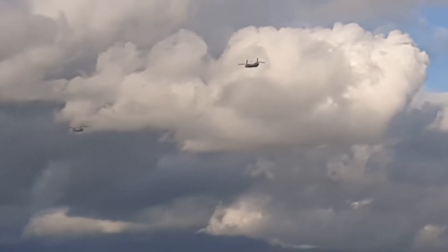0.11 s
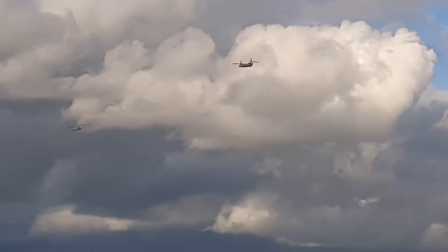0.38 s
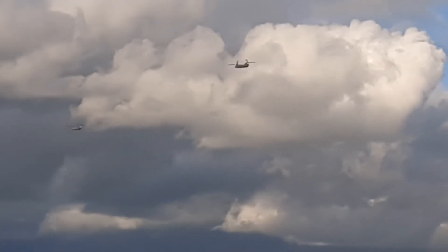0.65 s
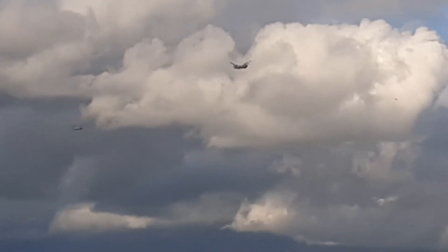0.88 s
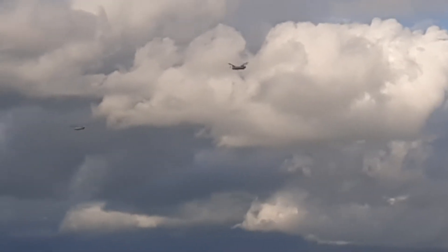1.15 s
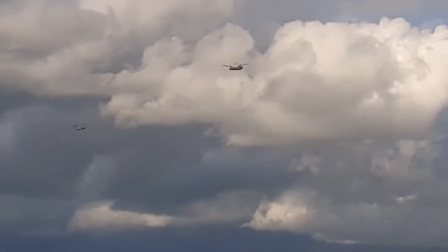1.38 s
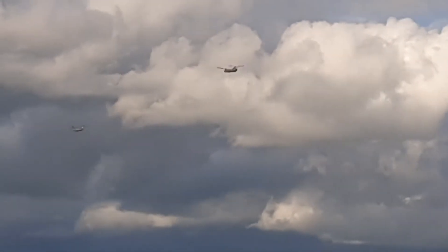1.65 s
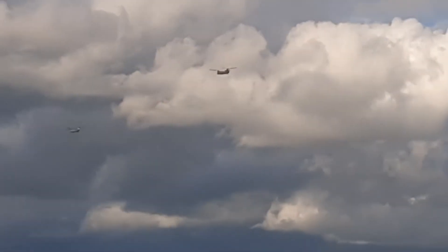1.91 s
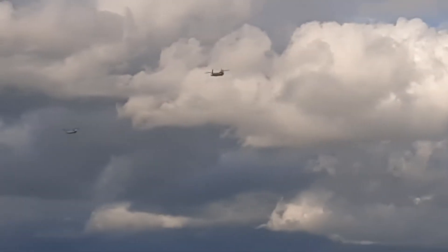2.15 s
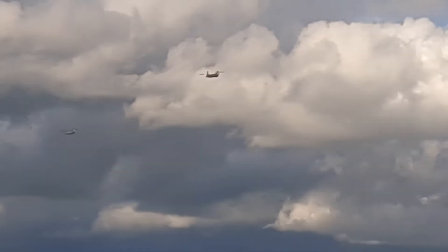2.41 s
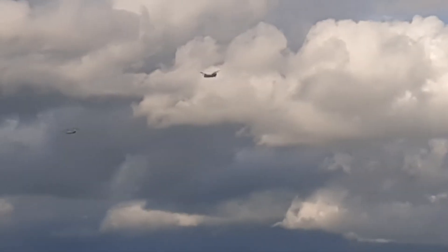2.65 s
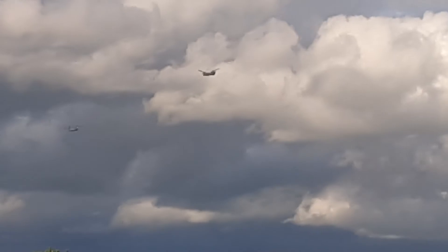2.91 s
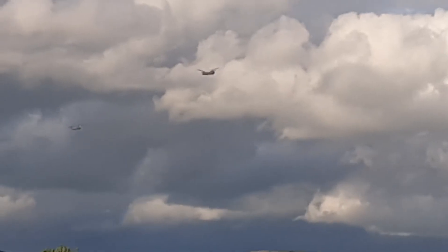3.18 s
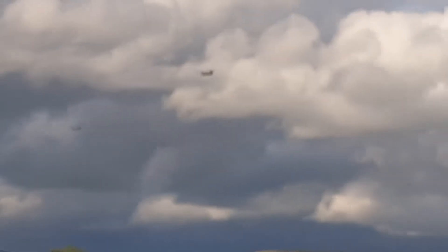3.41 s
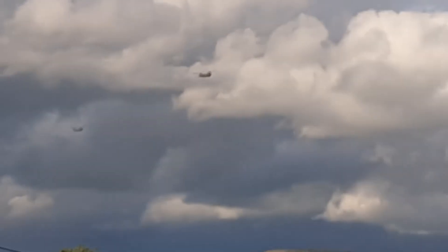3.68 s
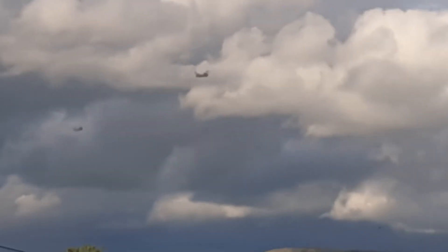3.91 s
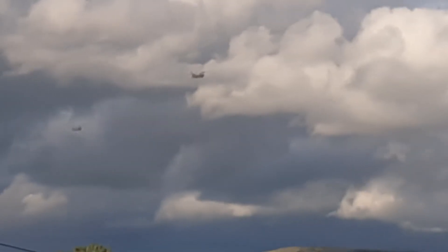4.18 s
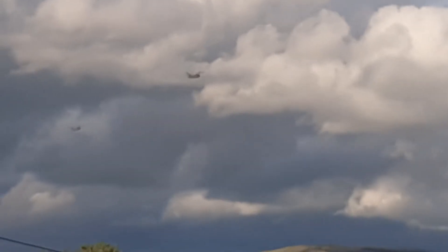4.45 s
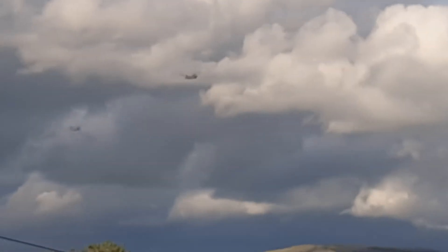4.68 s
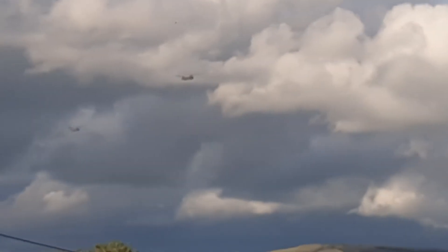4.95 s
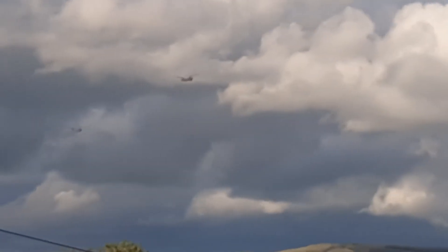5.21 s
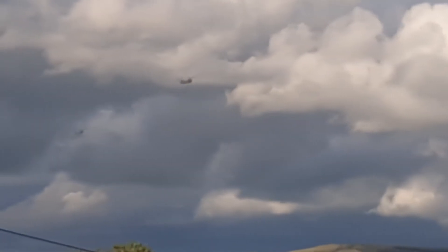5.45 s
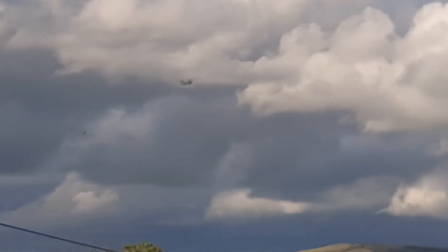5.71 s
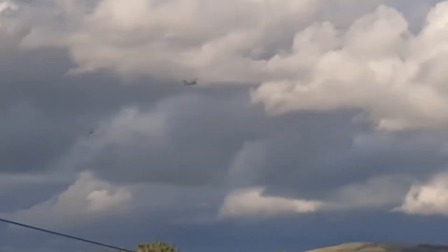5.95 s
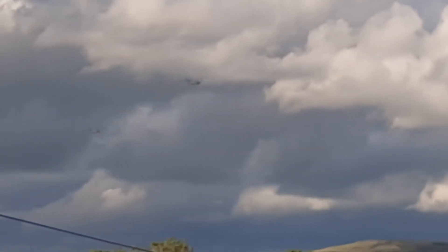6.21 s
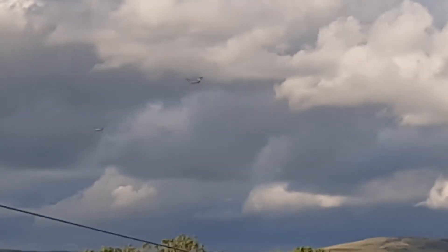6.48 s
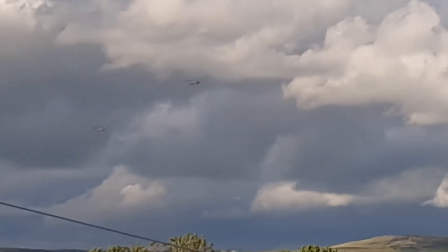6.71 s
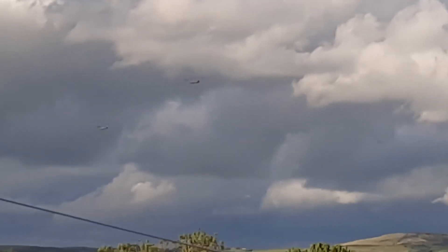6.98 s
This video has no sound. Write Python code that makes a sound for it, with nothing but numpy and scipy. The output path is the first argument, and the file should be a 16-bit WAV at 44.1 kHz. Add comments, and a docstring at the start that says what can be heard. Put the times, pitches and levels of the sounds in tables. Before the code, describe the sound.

Rapid low rotor thudding and dull roar from two receding helicopters, slaps sharpening midway and near the end, amid bumpy wind on the microphone.

```python
"""Two helicopters flying away

Two twin-rotor helicopters draw away, far off over open country, heard by a small two-port microphone.
Rotor thuds are pulses of pressure, blade slaps short bursts, the roar shaped noise and the whines blurred tones.
Slaps, roar and whines arrive straight and off the ground; the land scatters thuds and slaps.
Noise gusts and single pops buffet each port on its own, with a faint tick, over the recorder's hiss."""
import sys
import numpy as np
from scipy import signal
from scipy.fft import rfft, irfft, next_fast_len
from scipy.io import wavfile
from scipy.ndimage import uniform_filter1d

SR = 44100
rng = np.random.default_rng(int(sys.argv[2]) if len(sys.argv) > 2 else 0)


def unload_wav(signal):
    """Save mono or channel-first audio to the path in sys.argv[1] as 16-bit WAV at rate SR, clipped to [-1, 1]."""
    wavfile.write(
        sys.argv[1],
        SR,
        np.round(np.clip(np.atleast_2d(signal).T, -1, 1) * 32767).astype(np.int16),
    )


def ratio_of_db(decibels):
    """Turn decibels (scalar or array-like) into linear amplitude factors; 0 dB maps to 1."""
    return 10 ** (np.asarray(decibels, float) / 20)


N = 313110
T = np.arange(N) / SR  # time in seconds


def evened(x):
    """Scales a sound to an rms of 1."""
    return x / np.sqrt(np.mean(x ** 2) + 1e-20)


def columns(rows, at):
    """Reads every column of a table, joining its points by straight lines."""
    x, *values = np.transpose(rows)
    return np.array([np.interp(at, x, v) for v in values])


def spectra(rows, hz):
    """Reads the columns of a table along a logarithmic frequency axis."""
    log_rows = [(np.log(f), *v) for f, *v in rows]
    return columns(log_rows, np.log(hz + 1))


def coloured(x, rows):
    """Filters each channel by its own dB column."""
    hz = np.fft.rfftfreq(N, 1 / SR)
    return irfft(rfft(x) * ratio_of_db(spectra(rows, hz)), N)


def drift(seconds, channels=1):
    """Makes a slow random wander of rms 1, in steps of 32 samples, by smoothing noise twice."""
    size = max(int(seconds * SR / 32), 1)
    slow = rng.standard_normal((channels, N // 32 + 1))
    slow = uniform_filter1d(uniform_filter1d(slow, size), size)
    return np.repeat(evened(slow), 32, axis=1)[:, :N]


BEATS_PER_S = 11.25  # blade beats at the helicopter itself
# How each helicopter draws away ever faster. In order: reference time in seconds, distance then in m,
# speed away then in m/s, gain of speed in m/s per second.
FIRST_PATH = 0, 942.7, 13.56, 5.76
SECOND_PATH = 2.6, 999.0, 23.7, 2.43


def beats(path):
    """Counts the blade beats heard so far: sound from a growing distance comes later, stretching them."""
    s, metres, speed, gain = path
    away = T - s
    distance = metres + speed * away + gain * away ** 2 / 2
    return BEATS_PER_S * (T - distance / 343)  # speed of sound in m/s


# Blade passes, each heard once a beat for a while.
# Each row: place in the beat from 0 to 1, pitch in Hz before the distance stretches it,
# loudest moment in seconds, half length of the swell in seconds, peak in dB before unevenness and pan.
FIRST_THUDS = [(0.276, 52, 0.55, 0.95, -25.9), (0.009, 59, 0.56, 0.37, -25.5),
               (0.193, 165, 0.55, 0.67, -29.1), (0.736, 46, 0.73, 0.8, -30.3),
               (0.492, 48, 0.91, 0.88, -29.7), (0.881, 45, 0.9, 0.45, -24.5),
               (0.283, 109, 1.61, 0.21, -29.3), (0.99, 50, 1.92, 0.4, -20.5), (0.175, 72, 2.45, 0.5, -26.5),
               (0.405, 61, 2.56, 0.98, -27.3), (0.266, 119, 2.74, 0.4, -26), (0.197, 205, 2.8, 0.4, -26.5),
               (0.137, 160, 1.45, 0.3, -34), (0.148, 220, 1.92, 0.25, -30), (0.152, 170, 2.27, 0.2, -31),
               (0.257, 180, 2.27, 0.2, -30), (0.152, 210, 2.92, 0.18, -30), (0.275, 170, 2.9, 0.25, -31),
               (0.322, 76, 0.8, 0.4, -33), (0.2, 190, 1.9, 0.25, -30), (0.368, 76, 1.9, 0.3, -31),
               (0.13, 75, 2.3, 0.3, -31), (0.44, 75, 3.1, 0.3, -33), (0.023, 71, 2.87, 0.71, -26.3)]
SECOND_THUDS = [(0.807, 46, 3.07, 0.35, -24.9), (0.183, 74, 3.82, 0.39, -30.5),
                (0.996, 72, 4.05, 0.73, -24.3), (0.812, 64, 4.44, 0.99, -23.4),
                (0.945, 132, 4.62, 1.0, -24.5), (0.031, 67, 5.1, 0.78, -28), (0.56, 61, 6.14, 1.2, -32.3),
                (0.053, 65, 6.68, 0.63, -26.0), (0.407, 52, 6.76, 0.88, -38.5),
                (0.875, 175, 4.45, 0.4, -28), (0.647, 195, 6.85, 0.4, -24), (0.012, 170, 4.75, 0.4, -29),
                (0.185, 140, 6.55, 0.22, -29), (0.942, 190, 6.75, 0.45, -28), (0.772, 180, 6.9, 0.25, -30),
                (0.196, 62, 6.99, 1.1, -26.5), (0.801, 55, 7.16, 1.0, -25.0)]


def rotors(path, thuds):
    """Each blade pass is a push of air between two pulls, a little uneven over time."""
    beat, out = beats(path), np.zeros(N)
    for place, hz, s, swell, db in thuds:
        near = abs(T - s) < 2 * swell
        from_centre = (beat[near] - place + .5) % 1 - .5
        u = np.pi * hz * from_centre / BEATS_PER_S
        uneven_db = 1.7 * drift(0.14)[0, near]
        level = ratio_of_db(db + uneven_db) * np.exp(-((T[near] - s) / swell) ** 4)
        out[near] += level * np.cos(2 * u) * np.exp(-(u / 1.3) ** 2)
    return out * ratio_of_db([[-0.75], [0.75]])  # left, right


# Blades cutting the wake of the other rotor.
# Each row: centre in seconds, level of the body in dB before pan, crack against the body in dB,
# pitch of the body in Hz.
SLAPS = [(1.4405, -37, -30, 580), (1.5751, -30, -6, 580), (2.693, -40, -19, 560), (2.794, -35, -25, 580),
         (2.894, -33, -25, 486), (2.9835, -29.5, -9, 560), (3.048, -31, -23, 560), (3.602, -31, -27, 400),
         (3.7007, -25.5, -34, 420), (3.799, -25, -30, 460), (3.8951, -32.5, -36, 495),
         (4.0836, -27, -25, 390), (4.1823, -24.5, -36, 460), (4.2785, -24.5, -21, 462),
         (4.3745, -26, -39, 490), (4.4731, -24, -37, 494), (4.5693, -21.5, -19, 440),
         (4.6634, -14.5, -23, 460), (4.726, -31, -17, 613), (4.7602, -14, -17, 493),
         (4.8573, -17, -14.5, 475), (4.9541, -18.5, -11, 460), (5.051, -22.5, -5.5, 450),
         (5.1532, -29, -29, 460), (5.2483, -28.5, -43, 560), (5.3441, -30, -31, 593),
         (5.5301, -39, -37, 556), (6.251, -44, -7, 565), (6.4013, -33, -22, 505), (6.5247, -28, -6.5, 520),
         (6.5974, -31, -28, 407), (6.625, -30, -17, 600), (6.6933, -21, -8, 474), (6.744, -34, -27, 480),
         (6.7919, -25.5, -17, 456), (6.89, -25.5, -46, 510), (6.9356, -38, -14, 527),
         (6.9906, -28.5, -3, 418), (7.0893, -26.5, -6.5, 397)]


def slaps():
    """Bursts of a few cycles, softened by the long path; the crisp ones carry a higher crack."""
    body_s, crack_s, crack_hz = 0.0019, 0.0023, 750  # half lengths; pitch
    dull_stretch = 0.022  # a body lasts longer by this share for each dB its crack lacks
    out, t = np.zeros(N + SR), np.arange(-529, 529) / SR
    for s, db, crack_db, hz in SLAPS:
        half = body_s * (1 - dull_stretch * crack_db)
        body = np.exp(-(t / half) ** 2) * np.cos(2 * np.pi * hz * t + 1.2)
        crack = np.exp(-(t / crack_s) ** 2) * np.cos(2 * np.pi * crack_hz * t + 1.2)
        at = round(s * SR) - len(t) // 2
        out[at:at + len(t)] += (body + ratio_of_db(crack_db) * crack) * ratio_of_db(db)
    return out[:N] * ratio_of_db([[-1.25], [1.25]])  # left, right


# Engine and rotor roar, changing with distance and bent by restless air.
# Each row: time in seconds, level in dB before layers and colour, swell of the body in dB.
ROAR = [(0, -46, 2.5), (.4, -44.5, -2), (1.0, -44.5, -1.5), (1.6, -49, 1.5), (2.1, -50, 2), (2.6, -50.5, 1),
        (3.0, -51, 2.5), (3.4, -54.5, 6.5), (3.8, -49, -2), (4.1, -50, 3.5), (4.4, -50.5, 0.5),
        (4.85, -52.5, 9.5), (5.3, -54.5, 7.5), (5.8, -53.5, 0.5), (6.07, -59, 5.5), (6.55, -53, 4.5),
        (7.1, -50, 5)]
# Frequencies in Hz that split the roar into layers.
ROAR_SPLIT_HZ = 320, 510, 930, 1500
# One row a layer, low to high: dB over the mean level, share of the level changes,
# share of the body's swell, throb in dB.
ROAR_LAYERS = [(10, 0.66, 0.88, 2), (-1.5, 1, 1, 1), (8, 0.5, 0.49, 0.2), (-2.5, 0.77, 0.24, 0.37),
               (-5, 0.6, 0.1, 0.37)]
# Tone colour of the roar. Each row: frequency in Hz, left in dB, right in dB.
ROAR_COLOUR = [(28, -15, -17.5), (43.6, -5, 9.5), (70, 5, 11), (163, 5.5, 7), (222, -6, -5.5),
               (305, 6, 3.5), (420, 10.5, 12.5), (558, 2.5, 3.5), (946, -4.5, -1.5), (995, 1.5, 7.5),
               (1510, 2, 1), (1500, -2, 8.5), (1920, -1.5, 1.5), (2572, -8, -3.5), (3006, -17.5, -24.5),
               (3620, -65, -66.5)]
# How alike the two ports are. Each row: frequency in Hz, likeness (1 is the same).
ROAR_SAME = [(100, 1), (250, 0.99), (700, 0.96), (1000, 0.8), (1400, 0.45), (2600, 0.35)]
# The air briefly carries the roar more clearly. Each row: centre in seconds, half length in seconds,
# centre in Hz, boost in dB, reach in octaves.
SURGES = [(0.26, 0.12, 640, 4, 0.43), (1.455, 0.43, 740, 1, .77), (2.702, 0.21, 177, 7.5, 0.52),
          (3.12, 0.11, 715, 10.5, 0.71), (4.088, 0.1, 1500, 6, 0.82), (4.833, 0.089, 477, 5, 1),
          (5.356, 0.15, 617, 3, .77), (6.594, 0.056, 407, 3, .77), (6.86, 0.17, 220, 3.5, 1)]


def roar():
    """Noise in drifting patches, throbbing with the rotors, built as a spectrum that changes over time."""
    frames, hz = N // 256 + 5, np.fft.rfftfreq(1024, 1 / SR)
    a, b, c, d, patches = rng.standard_normal((frames, 513, 5)).T
    patches = evened(uniform_filter1d(uniform_filter1d(patches, 5, 0), 30, 1))
    # the right port shares part of the left port's noise
    same = np.clip(spectra(ROAR_SAME, hz)[0], -1, 1)[:, None]
    left = a + 1j * b
    right = same * left + np.sqrt(1 - same ** 2) * (c + 1j * d)
    t = np.arange(frames) * 256 / SR
    level, swell = columns(ROAR, t)
    layer = np.searchsorted(ROAR_SPLIT_HZ, hz)
    over, share, body, throb_db = np.transpose(ROAR_LAYERS)[:, layer, None]
    level_db = level.mean() + over + share * (level - level.mean()) + body * swell
    # throbs with the first helicopter, then with the second
    beat = np.where(T < 3.5, beats(FIRST_PATH) - .17, beats(SECOND_PATH) - .93)
    level_db += throb_db * np.interp(t, T, np.cos(2 * np.pi * beat))
    for s, half, centre, db, octaves in SURGES:
        reach = np.exp(-(np.log2((hz + 1) / centre) / octaves) ** 2)
        level_db = level_db + db * np.outer(reach, np.exp(-((t - s) / half) ** 2))
    colour_db = spectra(ROAR_COLOUR, hz)[:, :, None]
    z = np.array([left, right]) * ratio_of_db(colour_db + level_db + 1.82 * patches + 17.5)
    return signal.istft(z, nperseg=1024, noverlap=768)[1][:, :N] / 32


# Gearbox and engine tones blurred by the air.
# Each row: pitch in Hz, width of the blur in Hz, loudest moment in seconds,
# half length of the swell in seconds, level in dB before flicker and pan.
WHINES = [(2032, 20, 2.1, 6.2, -68), (1776, 14, 0.8, 0.9, -66), (1432, 20, 0.8, 0.9, -67),
          (1682, 10, 6.62, 0.16, -57), (1680, 10, 6.93, 0.2, -58.5), (1700, 70, 6.75, .3, -63),
          (1690, 6, 5.8, 0.17, -63), (1550, 8, 6.45, 0.5, -65), (635, 55, 0.18, 0.1, -40.5),
          (615, 75, .33, .09, -42), (590, 45, .46, .05, -47), (620, 85, 1.49, 0.16, -45),
          (630, 60, 1.07, .09, -47), (805, 30, 6.92, .22, -49.5), (800, 30, 5.92, .17, -51),
          (600, 30, 6.58, .12, -48), (845, 15, 4.02, .12, -53), (800, 20, 3.84, .06, -52),
          (1215, 25, 4.12, .13, -59), (1540, 20, 4.06, .16, -62), (2034, 15, .15, .2, -65)]


def whines():
    """Wavering tones that surface for a while and flicker, each in a narrow blur of noise."""
    steady_hz = 8  # at this width the tone itself is as loud as its blur
    size = next_fast_len(N)
    hz, out = np.fft.rfftfreq(size, 1 / SR), 0
    for centre_hz, width, s, swell, db in WHINES:
        noise = rfft(rng.standard_normal(size))
        blur = irfft(noise / (1 + ((hz - centre_hz) / width) ** 2), size)[:N]
        pitch = centre_hz + width / 2 * drift(.1)[0]
        tone = evened(np.sin(2 * np.pi * np.cumsum(pitch) / SR))
        sound = evened(evened(blur) + steady_hz / width * tone)
        level = ratio_of_db(db + 2.2 * drift(.05)) * np.exp(-((T - s) / swell) ** 4)
        out = out + level * sound
    return out * ratio_of_db([[-1.5], [1.5]])  # left, right


# The straight sound, ahead of the stronger bounce; one row for the left port, one for the right.
# Each row: lead in milliseconds, strength against the bounce before the treble blurs.
GROUND = [(4.659, 0.57), (4.949, 0.74)]


def ground(x, lag_ms):
    """Arrivals a few ms apart fill every 200 Hz or so and hollow between; they blur in the treble."""
    hz = np.fft.rfftfreq(N, 1 / SR)
    blur = np.exp(-(hz / 1900) ** 2)
    arrivals = [1 + share * blur * np.exp(2j * np.pi * hz * ms / 1000) for ms, share in GROUND]
    # a weak later bounce, 4.98 ms behind
    arrivals = arrivals + 0.083 * blur * np.exp(-2j * np.pi * hz * 4.98 / 1000)
    port_lag = np.exp(-2j * np.pi * np.outer([0, lag_ms / 1e3], hz))  # shifts the right port only
    return irfft(rfft(x) * arrivals * port_lag, N)


def land(x):
    """Hills and fields scatter thuds and slaps into a short rumble, a fading tail of noise."""
    t = np.arange(SR // 2) / SR
    shared = 13.0 * rng.standard_normal(len(t))
    tail = rng.standard_normal((2, len(t))) + shared
    tail = evened(tail) * ratio_of_db(-60 * t / 0.3)  # falls 60 dB in 0.3 s
    rumble = signal.fftconvolve(x, tail / np.linalg.norm(tail[0]), axes=1)[:, :N]
    return x + ratio_of_db(-17) * rumble


def tick():
    """A faint tick close by: a few quick cycles under a bell-shaped swell."""
    t = T - 1.579
    return ratio_of_db(-50) * np.exp(-(t / .0004) ** 2) * np.sin(2 * np.pi * 4600 * t)


# Gusts over a calm breeze.
# Each row: centre in seconds, half length in seconds, left peak in dB, right peak in dB,
# before the breeze and any other gusts add to them.
GUSTS = [(0.0, 0.0079, -20.5, -68), (0.117, 0.049, -31.5, -32), (0.29, 0.08, -42, -38.5),
         (0.538, 0.034, -43, -41.5), (0.73, 0.1, -32, -44), (0.984, 0.058, -28.5, -41),
         (1.04, 0.081, -32.5, -39), (1.131, 0.045, -27, -48), (1.34, 0.1, -36, -45),
         (1.89, 0.061, -35.5, -33), (2.61, 0.1, -42, -44.5), (3.016, .04, -55, -54),
         (3.238, 0.043, -65, -49), (3.3, 0.024, -39, -55), (3.497, 0.14, -38.5, -44),
         (3.666, 0.059, -29.5, -37), (3.854, 0.062, -34, -45), (4.016, 0.078, -31.5, -35.5),
         (4.145, 0.037, -34.5, -54), (4.295, 0.23, -39, -31), (4.582, 0.067, -33.5, -24),
         (4.715, 0.13, -27.5, -37), (5.02, 0.036, -25.5, -25.5), (5.201, 0.11, -35.5, -29),
         (5.388, 0.075, -21.5, -28), (5.535, 0.054, -26, -55), (5.65, 0.13, -40, -39),
         (5.764, 0.11, -28.5, -36.5), (6.146, 0.057, -31, -39), (6.302, 0.053, -28, -52),
         (6.448, 0.14, -32.5, -36), (6.607, 0.079, -37, -29.5), (6.784, 0.049, -29, -25),
         (6.904, 0.069, -31.5, -54), (6.965, 0.044, -40, -30), (7.066, 0.017, -30.5, -53)]


def gusts():
    """Wind level at each port in dB: short swells of power on top of a drifting breeze."""
    power = ratio_of_db(2 * (-50.5 + 4 * drift(0.17, channels=2)))
    for s, half, *db in GUSTS:
        near = abs(T - s) < 4 * half
        fall_db = 6 * ((T[near] - s) / half) ** 2  # 6 dB down at the half length
        power[:, near] += ratio_of_db(2 * (np.array(db)[:, None] - fall_db))
    return 10 * np.log10(power)


# Colour of the wind's body. Each row: frequency in Hz, left in dB, right in dB;
# the result is scaled to rms 1, so only the shape and the balance count.
WIND_COLOUR = [(20, -17, -15.5), (44.3, -5.5, -2), (76, 7.5, 5.5), (160, -3, -1), (220, -26, -25.5),
               (395, -37, -28.5), (1000, -94, -87.5)]
# Colour of the edge of hard gusts, also scaled. Each row: frequency in Hz, level in dB.
WIND_EDGE = [(100, -34.5), (200, -4), (330, -5), (480, -9), (700, -28), (2500, -97.5)]


def wind():
    """Lumpy low pressure, unrelated in the two ports; hard gusts grow a brighter edge."""
    hard_gust_db = -11.5  # at this level the edge would be as loud as the body
    lump_db = 3.5 * drift(0.0061, channels=2) + drift(0.095, channels=2)
    lumps = rng.standard_normal((2, N)) * ratio_of_db(lump_db)
    gust_db = gusts()
    body = evened(coloured(lumps, WIND_COLOUR))
    edge = ratio_of_db(gust_db - hard_gust_db) * evened(coloured(lumps, WIND_EDGE))
    return ratio_of_db(gust_db) * (body + edge)


# Single eddies popping on one port.
# Each row: centre in seconds, level in dB, port (0 left, 1 right), pitch in Hz.
POPS = [(.946, -23, 0, 158), (.983, -17.5, 0, 182), (1.013, -15, 0, 187), (1.128, -21, 0, 120),
        (1.158, -17.5, 0, 136), (4.529, -22, 1, 131), (4.59, -12.5, 1, 188), (4.647, -21, 1, 157),
        (4.682, -16.5, 0, 158), (5.015, -14, 0, 136), (5.035, -18, 0, 220), (5.035, -20, 1, 220),
        (5.121, -22, 1, 201), (5.312, -19, 0, 179), (5.332, -16.5, 0, 135), (5.384, -11, 0, 240),
        (5.407, -14.5, 0, 188), (5.426, -14.5, 0, 200), (5.512, -16, 0, 136), (5.537, -15, 0, 164),
        (5.557, -18.5, 0, 179), (5.76, -21.5, 0, 177), (5.81, -19, 0, 125), (6.307, -22, 0, 137),
        (6.45, -15, 0, 148), (6.756, -18, 0, 176), (6.77, -18, 0, 190), (6.914, -21, 0, 162),
        (6.934, -22, 0, 179)]


def pops():
    """Each eddy is about one swing of pressure, starting at a random point of its cycle."""
    out = np.zeros((2, N))
    for (s, db, port, hz), turn in zip(POPS, rng.random(len(POPS))):
        near = abs(T - s) < 2 / hz
        u = hz * (T[near] - s)  # time in cycles
        out[port, near] += ratio_of_db(db) * np.exp(-(u / 0.45) ** 2) * np.cos(2 * np.pi * (u + turn))
    return out


# Recorder hiss. Each row: frequency in Hz, left in dB per Hz, right in dB per Hz, before creep and waver.
HISS = [(1500, -108, -104), (2970, -112, -106), (3860, -105, -99.5), (5800, -109, -100.5),
        (6600, -119, -110), (7900, -127, -112), (8100, -129, -128), (10900, -124, -123),
        (12500, -117, -116), (15500, -115, -113), (15900, -150, -150)]
# The hiss level creeps. Each row: time in seconds, change in dB.
HISS_CREEP = [(0, 0), (1.8, -1.7), (4.2, 0.2), (7.1, 0.6)]


def recorder_hiss():
    """Coloured noise, unrelated in the two channels, whose level creeps and wavers slightly."""
    level_db = 0.79 * drift(0.018) + columns(HISS_CREEP, T)
    noise = rng.standard_normal((2, N)) * np.sqrt(SR / 2)  # 0 dB per Hz
    return coloured(noise * ratio_of_db(level_db), HISS)


def scene():
    """Both helicopters over the ground, the tick and the wind."""
    thuds = rotors(FIRST_PATH, FIRST_THUDS) + rotors(SECOND_PATH, SECOND_THUDS)
    beating = land(thuds + ground(slaps(), lag_ms=0.12))
    engines = ground(roar() + whines(), lag_ms=-0.05)
    return beating + engines + tick() + wind() + pops()


def roll_off(x):
    """The treble ends steeply here."""
    return signal.sosfilt(signal.butter(12, 15720, fs=SR, output="sos"), x)


def record(dry):
    """The recorder cuts the deep bass below about 37 Hz and adds its hiss."""
    bass_cut = signal.butter(2, 37, "high", fs=SR, output="sos")
    mix = signal.sosfiltfilt(bass_cut, dry) + recorder_hiss()
    return roll_off(mix)


dry = scene()
out = record(dry)
unload_wav(out)
```